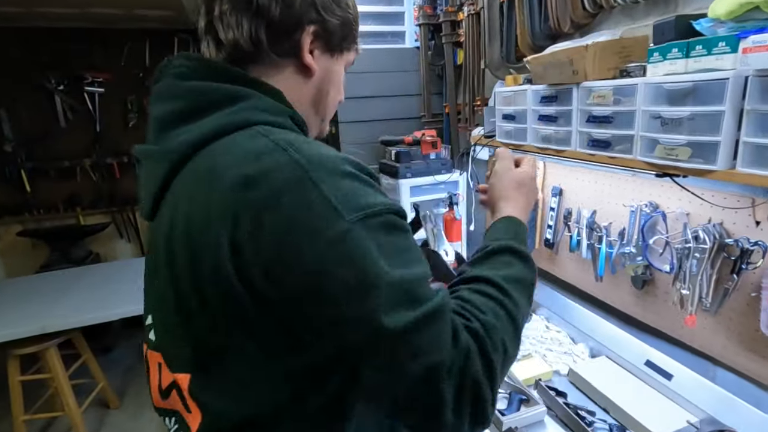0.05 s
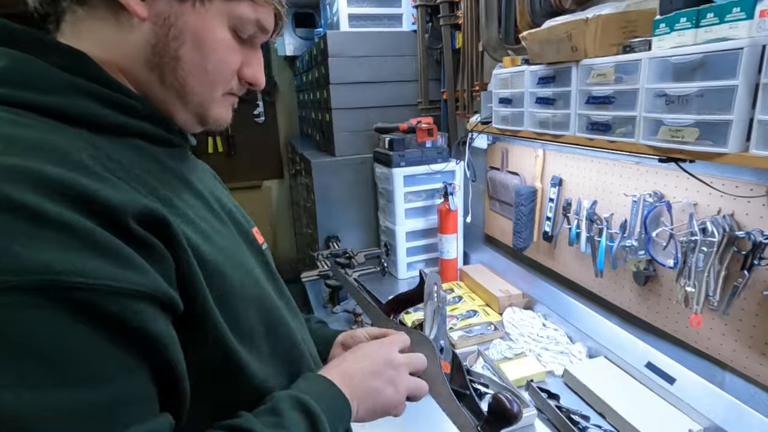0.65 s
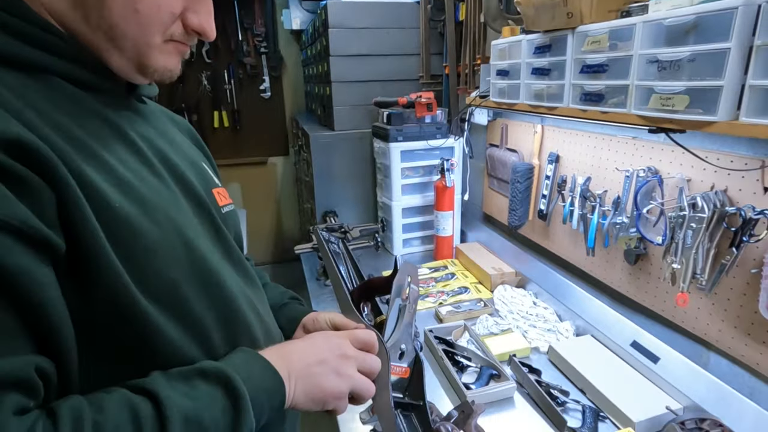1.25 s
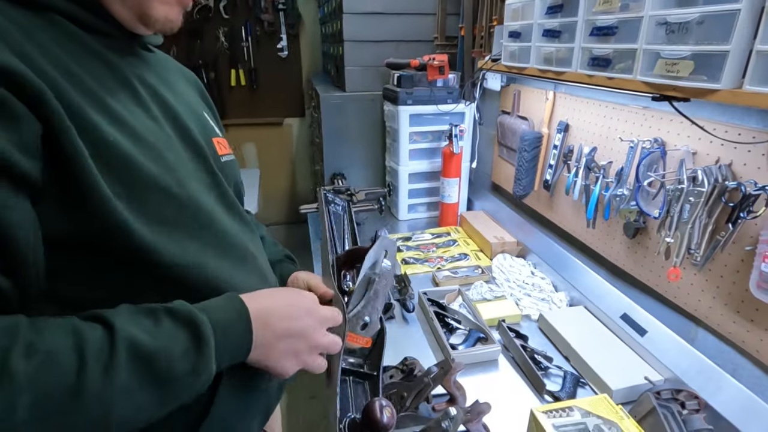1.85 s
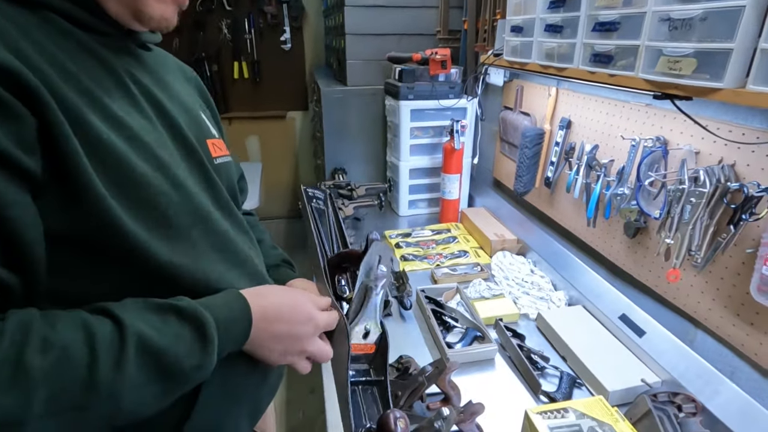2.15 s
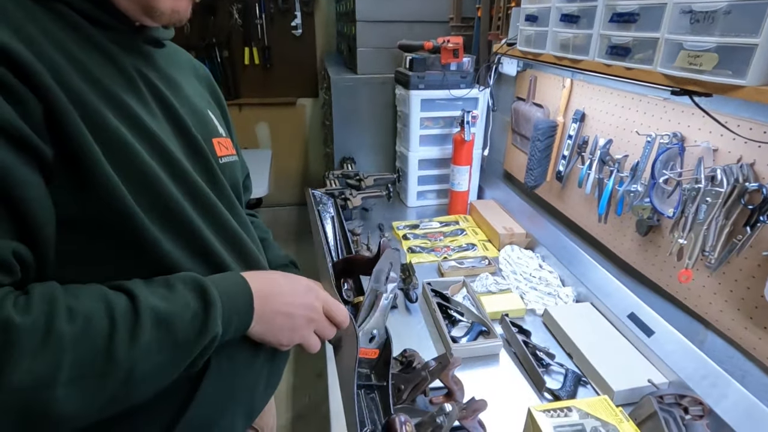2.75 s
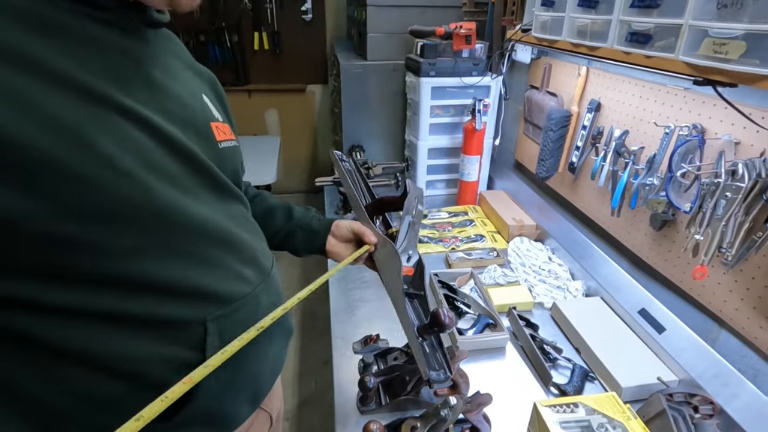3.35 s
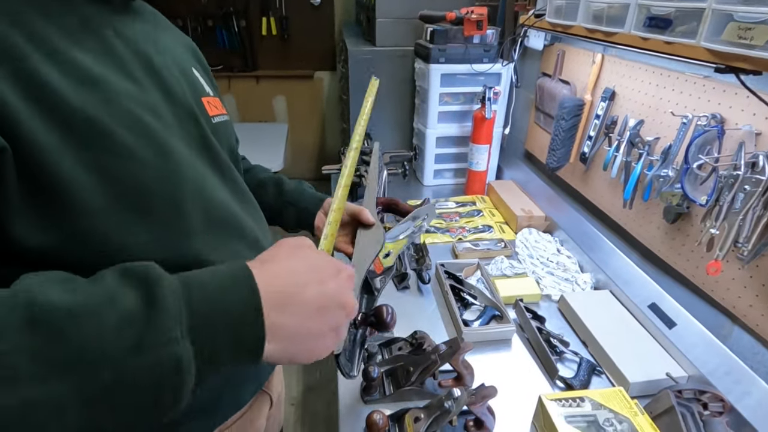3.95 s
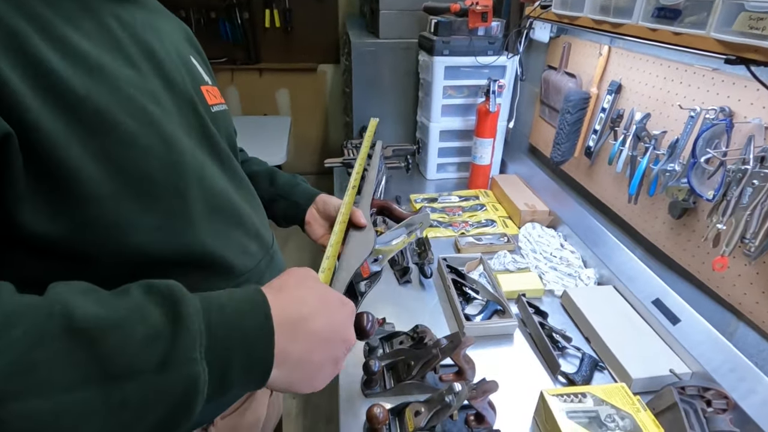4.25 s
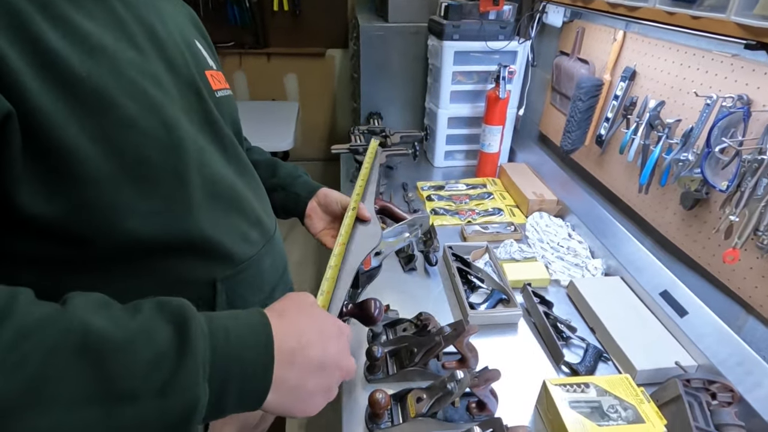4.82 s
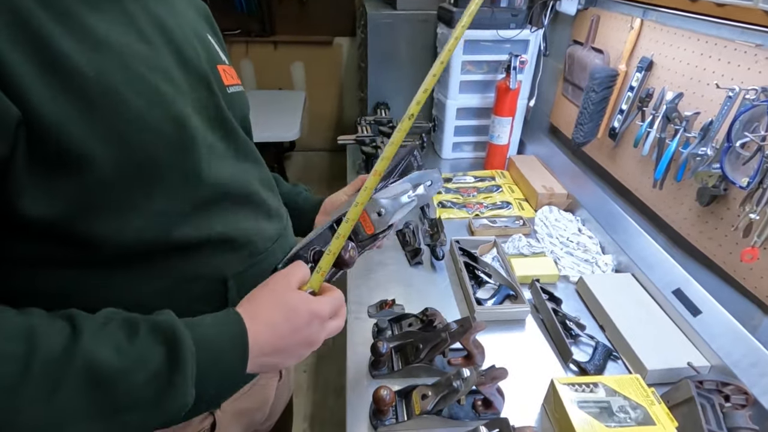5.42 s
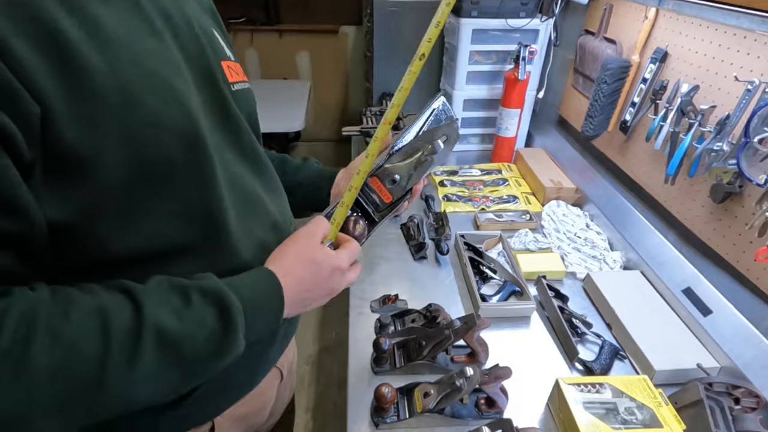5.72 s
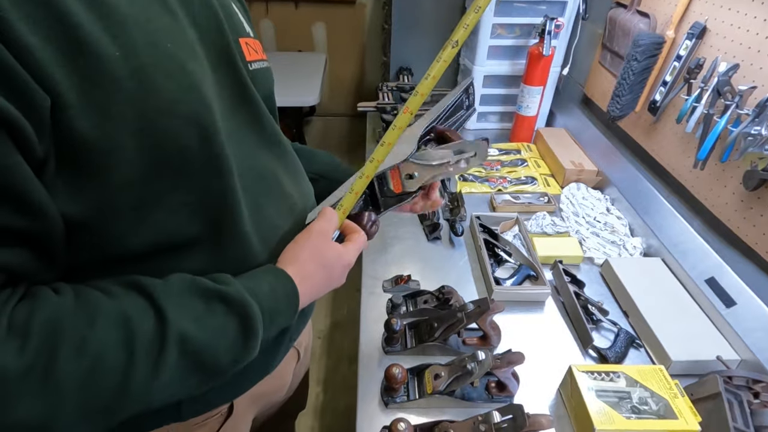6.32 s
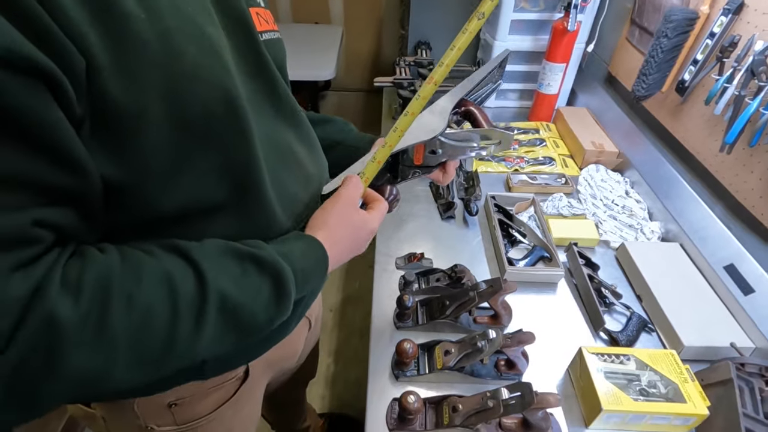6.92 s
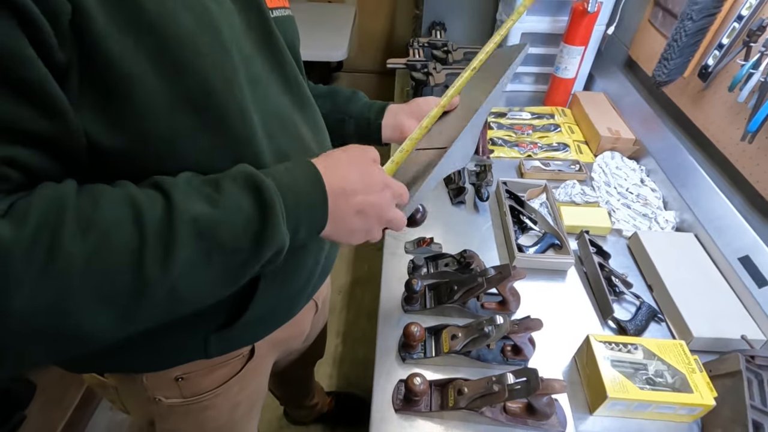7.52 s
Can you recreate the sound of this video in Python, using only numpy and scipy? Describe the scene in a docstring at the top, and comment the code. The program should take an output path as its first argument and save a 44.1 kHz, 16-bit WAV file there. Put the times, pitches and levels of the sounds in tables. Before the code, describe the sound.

Sharp metal clicks and scrapes, then a tape measure blade is pulled out, buckles and snaps, with cloth rustling in a small workshop.

```python
"""Sleeves rustle and a hand-held microphone rumbles over the faint fan of a small workshop.
The hook and case of a steel tape measure scrape and click on a long iron hand plane, which rings;
hands bump it. The blade is drawn out with a hiss of friction while its spool knocks in the case,
then buckles and slaps along the sole. Near the end a loose part of the plane clinks."""
import sys
import numpy as np
from scipy import signal
from scipy.fft import rfft, irfft, next_fast_len
from scipy.io import wavfile
from scipy.ndimage import uniform_filter1d, map_coordinates

SR = 44100
rng = np.random.default_rng(int(sys.argv[2]) if len(sys.argv) > 2 else 0)


def log_audio(samples):
    """Write samples as a 16-bit WAV file to the path given in sys.argv[1]."""
    # one column per channel
    frames = np.atleast_2d(samples).T
    # limit to full scale, then quantise
    limited = np.clip(frames, -1, 1)
    pcm = np.round(limited * 32767).astype(np.int16)
    wavfile.write(sys.argv[1], SR, pcm)


N = 338688

# dull spectrum of moving arms and soft blows: (frequency [Hz], level [dB])
SHUFFLE_SPECTRUM = [(60, -39), (100, -26), (165, 3), (250, 1), (350, -6.5), (500, -15.5), (900, -28),
                    (2000, -73)]


def amp(db):
    return 10 ** (np.asarray(db) / 20)


def unit(x):
    return x / np.sqrt(np.mean(x ** 2) + 1e-20)


def along(points, hz):
    """Interpolation of (frequency [Hz], value) points on a logarithmic axis."""
    frequencies, values = np.transpose(points)
    return np.interp(np.log(hz + 1), np.log(frequencies + 1), values)


def curve(points):
    """Linear interpolation of (time [s], value) points at every sample."""
    return np.interp(np.arange(N) / SR, *np.transpose(points))


def wobble(rate):
    """Random modulation: a smooth curve through rate knots a second."""
    knots = rng.standard_normal(int(N * rate / SR) + 4)
    return map_coordinates(knots, [np.arange(N) * rate / SR])


def fade(t, t60):
    """Exponential decay by 60 dB in t60 seconds."""
    return amp(-60 * t / np.maximum(t60, 1e-3))


def peak(hz, centre_hz, half_width_hz):
    """Lorentzian resonance of height 1."""
    return 1 / (1 + ((hz - centre_hz) / half_width_hz) ** 2)


def filtered(x, response):
    """Linear filtering: the spectrum is multiplied by a complex frequency response."""
    size = next_fast_len(N + SR // 2)
    return irfft(rfft(x, size) * response(np.fft.rfftfreq(size, 1 / SR)), size)[..., :N]


def coloured(x, gain, size=2048):
    """Minimum-phase filtering: folding the cepstrum makes the response causal."""
    cepstrum = irfft(np.log(np.maximum(gain(np.fft.rfftfreq(size, 1 / SR)), 1e-6)))
    cepstrum[1:size // 2] *= 2
    cepstrum[size // 2 + 1:] = 0
    return signal.fftconvolve(x, irfft(np.exp(rfft(cepstrum))))[:len(x)]


def rush(spectrum, side_db):
    """Partly coherent stereo noise of rms 1; the side signal sets its width."""
    noise = filtered(rng.standard_normal((2, N)), lambda hz: amp(along(spectrum, hz)))
    mid, side = noise * amp([[0], [side_db]])
    return unit(np.array([mid + side, mid - side]))


def burst(envelope, passes=3):
    """Broadband excitation: enveloped noise, whitened so that it has no colour of its own."""
    size = len(envelope)
    x = rng.standard_normal(size) * envelope
    for _ in range(passes):
        spectrum = rfft(x, 2 * size)
        power = np.abs(uniform_filter1d(np.abs(spectrum) ** 2, size // 64))
        x = irfft(spectrum / np.sqrt(power + 1e-12))[:size]
    return x * np.linalg.norm(envelope) / np.linalg.norm(x)


def ringing(modes, t, knots):
    """Modal superposition: damped partials, roughened by random amplitude and phase modulation."""
    hz, db, t60 = np.transpose(modes)[:, :, None]
    draws = rng.standard_normal((2, len(modes), knots))
    grid = np.linspace(0, t[-1], knots)
    in_phase, quadrature = [np.array([np.interp(t, grid, row) for row in part]) for part in draws]
    phase = 2 * np.pi * (hz * t + rng.random(hz.shape))
    partials = (1 + .5 * in_phase) * np.sin(phase) + .5 * quadrature * np.cos(phase)
    return np.sum(amp(db) * fade(t, t60) * partials, axis=0)


def add(track, start, sound):
    """Superposition of a sound on the track from start [s]."""
    part = track[..., max(round(start * SR), 0):][..., :sound.shape[-1]]
    part += sound[..., :part.shape[-1]]


def in_room(sound, early_db, early_t60, tail_db, side_db):
    """Reverberation: direct sound, early reflections from bench and wall, and a diffuse tail."""
    # reverberation time of the workshop: (frequency [Hz], t60 [s])
    room_t60 = [(150, 0.55), (1000, 0.63), (3000, 0.42), (7000, 0.39), (13000, 0.29)]
    hz, t, noise = signal.stft(rng.standard_normal((2, SR // 2)), SR, nperseg=256)
    decay = amp(tail_db) * fade(t, along(room_t60, hz)[:, None]) + amp(early_db) * fade(t, early_t60)
    mid, side = signal.istft(noise * decay, SR, nperseg=256)[1] * amp([[0], [side_db]])
    response = np.array([mid + side, mid - side])
    response[:, :round(.003 * SR)] = 0  # gap before the first reflection
    response[:, 0] = 1
    return signal.fftconvolve(sound[None], response, axes=1)


def air_and_fan(air_db=-58.5, whine_db=-1):
    """Tones over broadband noise: a fan whines in the room air, wavering in amplitude and phase."""
    # noise of the room air: (frequency [Hz], level [dB])
    air_spectrum = [(59, -18), (100, -7.5), (140, 5.5), (185, 3.5), (415, -12.5), (801, -18), (1170, -12),
                    (1680, -14), (1830, -12.5), (2170, -12.5), (3120, -27.5), (5530, -18.5), (9210, -32.5),
                    (11900, -30), (16000, -57)]
    # partials of the fan: (frequency [Hz], level [dB])
    fan_tones = [(1200, -81), (1561, -77.5), (1680, -76.5), (1798, -73), (2040, -88), (2939, -82)]
    t = np.arange(N) / SR
    tone = lambda hz: np.sqrt(2) * amp(wobble(5)) * np.sin(2 * np.pi * hz * t + wobble(14))
    whine = np.array([sum(amp(db + whine_db) * tone(hz) for hz, db in fan_tones) for _ in range(2)])
    return amp(air_db) * rush(air_spectrum, side_db=0) + whine


def handling(attack_s=0.03, release_t60=0.48, sway_db=2, lean_db=1):
    """Friction and handling noise: sleeves catch, arms shuffle, the swaying microphone rumbles."""
    # arm movements: (time [s], duration [s], sleeve level [dB], shuffle level [dB])
    moves = [(-0.03, 0.11, -46.5, -54.5), (0.1, 0.868, -57.5, -62), (1.292, 0.67, -59.5, -57.5),
             (1.544, 0.052, -63, -50), (2.126, 0.068, -52, -49), (2.29, 0.57, -60, -66),
             (3.472, 0.524, -64, -54.5), (4.02, 0.11, -60, -49.5), (4.84, 0.08, -52.5, -62),
             (5.327, 0.6, -57.5, -66.5), (6.24, 0.34, -63, -66.5), (7.05, 0.55, -66, -55.5)]
    # rubbing cloth: (frequency [Hz], level [dB])
    cloth_spectrum = [(290, -32), (500, -4), (613, -3), (698, -7.5), (906, -9.5), (1180, 1), (3440, -6),
                      (5160, -5.5), (8580, -18.5), (11800, -24.5), (16000, -41)]
    # microphone rumble: (frequency [Hz], level [dB])
    rumble_spectrum = [(8, 2.5), (18, 8), (30, 3), (45, -10), (65, -15), (100, -34), (200, -70), (500, -89)]
    # course of the rumble: (time [s], level [dB])
    rumble_levels = [(0, -45.5), (1.3, -46), (1.6, -40), (3.1, -43), (4.1, -41.5), (4.5, -49), (5.95, -44),
                     (6.35, -47.5), (7.68, -48)]
    t, rub, motion = np.arange(N) / SR, np.zeros(N), np.zeros(N)
    for start, length, rub_db, shuffle_db in moves:
        attack = np.clip((t - start) / attack_s, 0, 1)
        effort = attack * fade(np.maximum(t - start - length, 0), release_t60)
        rub += amp(rub_db - 3) * effort
        motion += amp(shuffle_db - 1) * effort
    grain = unit(amp(1.65 * wobble(400) + 1.14 * wobble(25)))
    cloth = rub * grain * rush(cloth_spectrum, side_db=-7)
    shuffle = motion * unit(amp(2.4 * wobble(14))) * rush(SHUFFLE_SPECTRUM, side_db=-6)
    rumble = amp(curve(rumble_levels) + sway_db * wobble(4.6)) * rush(rumble_spectrum, side_db=-10.5)
    return cloth + (shuffle + rumble) * amp([[-lean_db], [lean_db]])


def scrapes(grain_db=8, relative_width=0.29):
    """Stick-slip friction: a run of tiny slips excites one resonance, swelling and fading."""
    # case and blade sliding on the iron: (time [s], level [dB], duration [s], resonance [Hz])
    slides = [(0.406, -41, 0.012, 1990), (1.416, -55, 0.039, 6000), (1.678, -43, 0.033, 2800),
              (1.777, -43.5, 0.029, 4300), (2.154, -51.5, 0.1, 1270), (2.261, -48, 0.026, 3040),
              (2.323, -37, 0.021, 4550), (2.449, -46, 0.055, 3200), (2.475, -41.5, 0.023, 3440),
              (2.643, -52, 0.049, 3160), (4.475, -57.5, 0.0088, 2470), (5.065, -52, 0.038, 2520),
              (5.849, -53, 0.11, 6300), (6.172, -47, 0.023, 1730), (6.432, -46, 0.048, 2840)]
    track, t = np.zeros((2, N)), np.arange(SR // 3) / SR
    for start, db, length, centre_hz in slides:
        slips = rng.standard_normal(len(t)) * unit(amp(grain_db * wobble(684)[:len(t)]))
        grit = unit(coloured(slips, lambda hz: peak(hz, centre_hz, relative_width * centre_hz) ** 0.7))
        progress = t / length
        swell = 3 * progress * np.exp(1 - 3 * progress)
        scrape = amp(db) * swell * grit
        add(track, start, in_room(scrape, early_db=-21.5, early_t60=0.084, tail_db=-47, side_db=-6))
    return track


def contacts(gap_s=0.014, slowing=1.4, loss_db=3.5, brightening=1.8, touches_per_s=0.7, touch_db=-49):
    """Rebound: each contact of a rattle is weaker and thinner; the hook also touches faintly by chance."""
    # hook and case striking the iron:
    # (time [s], level [dB], brightness [dB/octave], low ring [Hz], high ring [Hz], contacts [count])
    blows = [(0.416, -20, 0, 1930, 5850, 3), (0.737, -12.5, 2.7, 2900, 6650, 1),
             (1.178, -35.5, -2.5, 3190, 6100, 1), (1.493, -22.5, -1.5, 1920, 4640, 1),
             (1.533, -11, 1, 2790, 3980, 1), (1.626, -6.5, -0.4, 2520, 7500, 1),
             (1.72, -21, -2, 1180, 5900, 1), (1.796, -19, -3.5, 1280, 4230, 3),
             (2.123, -25.5, 0, 2220, 5860, 1), (2.336, -22.5, 0, 2550, 4760, 1),
             (2.549, -32.5, -3, 1870, 3800, 1), (2.604, -36, -5, 2800, 3670, 1),
             (2.765, -36, -1, 2390, 5640, 1), (2.931, -14.5, 2.5, 2900, 3700, 1),
             (2.992, -23, 1.5, 1740, 4660, 1), (3.419, -23, 1, 3130, 4070, 1),
             (3.529, -29, -1.5, 1630, 4970, 1), (3.623, -28, 0.5, 1610, 5000, 1),
             (3.904, -38.5, 0.5, 2020, 4290, 1), (4.003, -34.5, -1, 1280, 3900, 1),
             (5.051, -32.5, -2, 2500, 3660, 1), (5.29, -24, 10, 2860, 6500, 1),
             (5.347, -35, -5.5, 1600, 6800, 1), (5.569, -17.5, 0.5, 1920, 6440, 2),
             (6.422, -33.5, 2, 3200, 6280, 1), (6.656, -30.5, 3.5, 2600, 4940, 1),
             (7.339, -17.5, -3, 1830, 5350, 2), (7.372, -24, 2.5, 2450, 5660, 2)]
    rows = []
    for start, db, brightness, low_hz, high_hz, count in blows:
        for k in range(round(count)):
            rows.append((start, db - loss_db * k, brightness + brightening * k, low_hz, high_hz))
            start += gap_s * slowing ** k
    for when, low, high in rng.random((round(touches_per_s * N / SR), 3)):
        rows.append((when * N / SR, touch_db, 0, 1600 * 2 ** low, 3800 * 2 ** high))
    return rows


def clicks(pivot_hz=4540, ring_db=9, chatter_db=-14, chatter_t60=0.037, gain_db=7):
    """Impact of steel on iron: a crack and chatter, whose tilt and two rings depend on where it lands."""
    # spectrum of a contact: (frequency [Hz], level [dB])
    click_spectrum = [(300, -12.5), (750, -10.5), (1300, -7), (2150, -4.5), (4140, -7), (6650, -6),
                      (10900, -16.5), (16000, -20)]
    # modes of the iron casting: (frequency [Hz], level [dB], t60 [s])
    iron_modes = [(625, -13, 0.5), (754, -5.5, 0.16), (910, -21, 0.18), (1358, -5, 0.48), (1812, 5, 0.1),
                  (2330, -5, 0.15), (2735, 3, 0.14), (2920, -27, .12), (7200, -6, .08), (7550, -3, .08)]
    track, t = np.zeros((2, N)), np.arange(SR // 3) / SR
    for start, db, brightness, low_hz, high_hz in contacts():
        tilt = lambda hz: brightness * np.log2(np.clip(hz, 600, 12000) / pivot_hz)
        rings = lambda hz: peak(hz, low_hz, half_width_hz=170) + peak(hz, high_hz, half_width_hz=380)
        rise_s = 0.0002 * amp(-db) ** 0.62  # light touches build up more slowly
        crack_t60 = 0.0092 * (1 - 0.0429 * db)  # and last longer
        onset = 1 - np.exp(-t / rise_s)
        crack = burst(onset * (fade(t, crack_t60) + amp(chatter_db) * fade(t, chatter_t60)))
        hit = coloured(crack, lambda hz: amp(along(click_spectrum, hz) + tilt(hz) + ring_db * rings(hz)))
        iron_db = -40.5 - 2.5 * brightness  # dull, heavy contacts ring the casting more
        click = amp(db + gain_db) * (hit + amp(iron_db) * ringing(iron_modes, t, knots=70))
        add(track, start, in_room(click, early_db=-30.5, early_t60=0.073, tail_db=-39.5, side_db=-4))
    return track


def bumps(attack_s=0.0035, thud_t60=0.21, thud_db=3):
    """Soft impact: a cushioned blow excites one low mode over a dull thud."""
    # blows of hand and case: (time [s], level [dB], frequency [Hz], t60 [s])
    soft_blows = [(0.742, -40, 141.4, 0.19), (1.14, -43, 150, 0.18), (1.565, -37, 158.5, 0.13),
                  (1.592, -40, 143, 0.12), (1.639, -46, 252, 0.21), (1.679, -53, 164, 0.15),
                  (1.896, -27.5, 148.6, 0.17), (2.161, -35, 250, 0.14), (7.34, -45, 327, 0.16)]
    track, t = np.zeros(N), np.arange(SR // 2) / SR
    onset = 1 - np.exp(-t / attack_s)
    for start, db, mode_hz, t60 in soft_blows:
        thud = coloured(burst(fade(t, thud_t60)), lambda hz: amp(along(SHUFFLE_SPECTRUM, hz) + thud_db))
        mode = np.sin(2 * np.pi * mode_hz * t) * fade(t, t60)
        add(track, start, amp(db) * onset * (mode + thud))
    return track


def blade_pull(ramp_s=0.017, grain_db=2, ticks_per_s=90, tick_db=-6.5, gain_db=1, lean_db=1):
    """Sliding friction: the blade hisses through the case mouth as the coil ticks against itself."""
    # course of the pull: (time [s], level [dB])
    pull_levels = [(2.96, -64), (2.984, -50), (3.106, -54), (3.164, -47.5), (3.342, -43), (3.432, -48.5),
                   (3.56, -59), (3.6, -89)]
    # the sliding blade: (frequency [Hz], level [dB])
    slide_spectrum = [(180, -34), (300, -1.5), (379, -11), (614, -15), (946, -10.5), (1300, -2.5),
                      (1560, -6.5), (2030, -7), (2480, -4.5), (3640, -6.5), (4020, -3.5), (7820, -8.5),
                      (9390, -18), (11900, -11), (16000, -36)]
    t = np.arange(N) / SR
    start, end = pull_levels[0][0], pull_levels[-1][0]
    moving = np.clip(np.minimum(t - start, end - t) / ramp_s, 0, 1)
    hiss = unit(amp(grain_db * wobble(500) + wobble(45))) * rush(slide_spectrum, side_db=-5.5)
    impulses = (rng.random(N) < ticks_per_s / SR) * rng.standard_normal(N)
    ticks = signal.fftconvolve(impulses, burst(fade(t[:1024], t60=.008)))[:N]
    rasp = amp(tick_db) * unit(coloured(ticks, lambda hz: amp(along(slide_spectrum, hz))))
    return moving * amp(curve(pull_levels) + gain_db) * (hiss + rasp) * amp([[lean_db], [-lean_db]])


def spool_knocks(knock_t60=0.022, hollow_db=4, half_width_hz=220, gain_db=10):
    """Resonance of a hollow shell: the unwinding spool knocks against its plastic case."""
    # catches of the spool: (time [s], level [dB], resonance [Hz])
    catches = [(3.138, -32, 1240), (3.176, -24.5, 1070), (3.25, -25.5, 900), (3.274, -23, 800),
               (3.3883, -25, 1350)]
    # response of the case: (frequency [Hz], level [dB])
    case_spectrum = [(250, -18), (480, 3.5), (700, 3.5), (1300, 3.5), (1600, -7), (2500, -3), (3400, -11.5),
                     (4300, -4), (6000, -15), (12000, -29)]
    track, t = np.zeros((2, N)), np.arange(SR // 3) / SR
    for start, db, centre_hz in catches:
        shell = lambda hz: amp(along(case_spectrum, hz) + hollow_db * peak(hz, centre_hz, half_width_hz))
        knock = amp(db + gain_db) * coloured(burst(fade(t, knock_t60)), shell)
        add(track, start, in_room(knock, early_db=-27, early_t60=0.095, tail_db=-47.5, side_db=-5))
    return track


def snaps(swing_s=0.0507, buckle_s=4.053, hold_s=0.068, buckle_db=-14, fade_db_per_s=83, count=19):
    """Oscillation and buckling: the free end slaps once a swing; the blade crinkles as it gives way."""
    # the blade striking the sole: (time [s], level [dB], swings [count], loss per swing [dB])
    strikes = [(4.051, -16, 1, 0), (4.073, -9, 1, 0), (4.106, -10.5, 5, 2.5), (4.1116, -7, 1, 0),
               (4.224, -14, 1, 0), (4.325, -22, 1, 0), (4.428, -23.5, 1, 0), (4.685, -12.5, 1, 0),
               (4.717, -16, 1, 0), (4.8546, -12, 4, 6.5), (4.864, -8, 1, 0), (4.963, -22, 1, 0)]
    slaps = [(start + swing_s * k, db - loss_db * k)
             for start, db, swings, loss_db in strikes for k in range(round(swings))]
    gaps_s = 0.005 * 1.07 ** np.arange(count)  # the crinkle thins out
    ages = np.cumsum(gaps_s) - gaps_s * rng.uniform(.5, 1, count)
    levels = buckle_db - fade_db_per_s * np.maximum(ages - hold_s, 0) + rng.normal(0, 2, count)
    return slaps + list(zip(buckle_s + ages, levels))


def blade_slaps(rise_s=0.00086, snap_t60=.011, flex_t60=0.11, modes_db=-35, gain_db=11):
    """Bending vibration: the curved strip snaps near 6 kHz; hard slaps flex lower, longer-lived modes."""
    # ring of a snap: (frequency [Hz], level [dB])
    ring_spectrum = [(3000, -30.5), (4200, -17), (4800, -18.5), (5250, -12.5), (5620, -3.5), (6000, -12.5),
                     (6450, -7.5), (7100, -17.5), (7900, -17.5), (8700, -35), (11000, -37)]
    # treble edge of a snap: (frequency [Hz], level [dB])
    edge_spectrum = [(7000, -31), (9000, -4.5), (10200, -6.5), (12000, -22.5), (15000, -11)]
    # flexing of the strip: (frequency [Hz], level [dB])
    flex_spectrum = [(400, -23), (800, -26.5), (1300, -10.5), (1780, -12.5), (2100, -11), (2450, -8),
                     (2900, -11.5), (3150, -5), (3450, -29), (3900, -7), (4700, -51), (5500, -26)]
    # modes of the strip: (frequency [Hz], level [dB], t60 [s])
    blade_modes = [(1816, -7.5, 0.1), (2410, -13, .2), (3250, -13.5, 0.18), (5160, -8, 0.058),
                   (5600, -8, 0.074), (5760, -19, 0.077), (5900, -14, 0.1), (6300, -15, 0.081),
                   (6940, -20, 0.098)]
    track, t = np.zeros((2, N)), np.arange(SR // 3) / SR
    onset = 1 - np.exp(-t / rise_s)
    bright = lambda hz: np.hypot(amp(along(ring_spectrum, hz) + 7.5), amp(along(edge_spectrum, hz) - 11))
    for start, db in snaps():
        snap = coloured(burst(onset * fade(t, snap_t60)), bright)
        flex_db = -4 + 1.04 * db  # the share of flexing grows with force
        body = lambda hz: amp(along(flex_spectrum, hz) + flex_db)
        flex = coloured(burst(onset * fade(t, flex_t60)), body)
        slap = amp(db + gain_db) * (snap + flex + amp(modes_db) * ringing(blade_modes, t, knots=50))
        add(track, start, in_room(slap, early_db=-24, early_t60=0.048, tail_db=-43, side_db=-3))
    return track


def clinks(grit_t60=0.057, grit_db=7, gain_db=-7):
    """Free vibration: a loose steel part shifts grittily and rings as the plane is turned over."""
    # shifts of the part: (time [s], level [dB])
    shifts = [(6.647, -37), (6.6567, -33)]
    # modes of the part: (frequency [Hz], level [dB], t60 [s])
    part_modes = [(1812, 2, 0.089), (2290, -5, 0.073), (2565, -7.5, 0.073), (3470, -5.5, 0.054),
                  (3920, -4, 0.04), (3980, -2.5, 0.035), (4930, -8, 0.067), (7000, -5, 0.037)]
    track, t = np.zeros((2, N)), np.arange(SR // 3) / SR
    for start, db in shifts:
        grit = coloured(burst(fade(t, grit_t60)), lambda hz: amp(grit_db) * peak(hz, 2700, 1600))
        clink = amp(db + gain_db) * (ringing(part_modes, t, knots=60) + grit)
        add(track, start, in_room(clink, early_db=-19.5, early_t60=0.057, tail_db=-40.5, side_db=-6))
    return track


def scene(lag_samples=0.81):
    """Time and level cues: impacts and scrapes reach the right microphone port before the left."""
    # response of the microphone: (frequency [Hz], gain [dB])
    mic_response = [(60, -2.5), (200, -15.5), (500, -10), (1000, -7), (7800, -3.5), (9300, -10.5),
                    (11800, 2.5), (13000, -9), (14000, -12.5), (16000, -27)]
    # balance of its ports: (frequency [Hz], left over right [dB])
    balance = [(300, -2.5), (2400, 2.5), (4400, 1.5), (6500, 4), (8500, 8), (10000, 6), (11500, 1.5),
               (15000, 1.5)]
    gain = lambda hz: amp(along(mic_response, hz) + np.outer([.5, -.5], along(balance, hz)))
    delay = lambda hz: np.exp(np.outer([-1j, 1j], np.pi * hz * lag_samples / SR))
    tools = clicks() + blade_slaps() + spool_knocks() + clinks() + scrapes()
    at_ports = filtered(tools, lambda hz: gain(hz) * delay(hz))
    return at_ports + bumps() + blade_pull() + handling() + air_and_fan()


def record(dry):
    """Band limiting: an ideal low-pass filter cuts off at 16 kHz."""
    return filtered(dry, lambda hz: hz < 16000)


dry = scene()
out = record(dry)
log_audio(out)
```